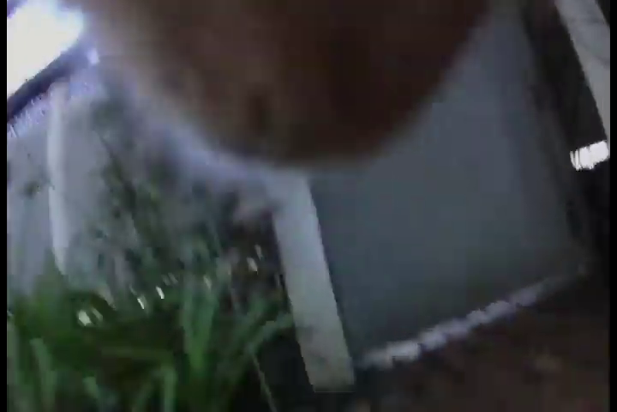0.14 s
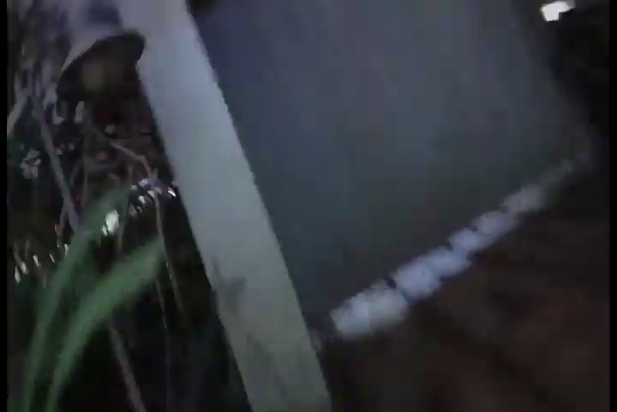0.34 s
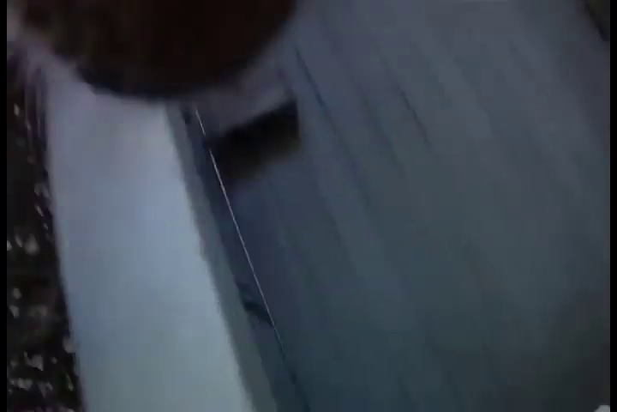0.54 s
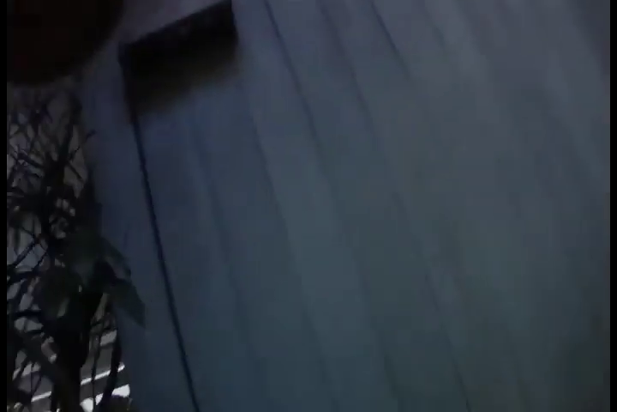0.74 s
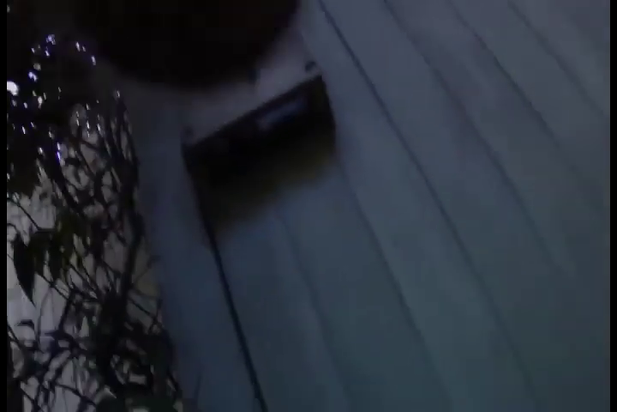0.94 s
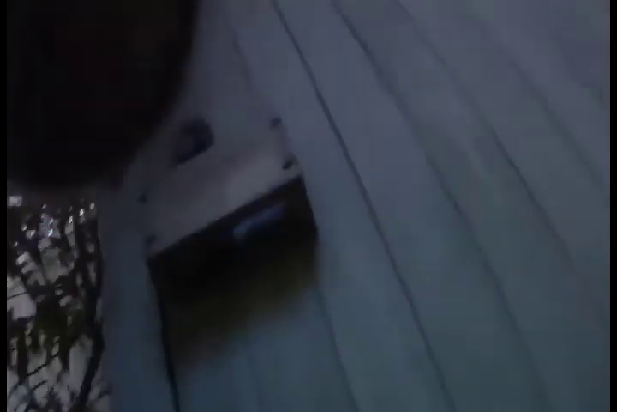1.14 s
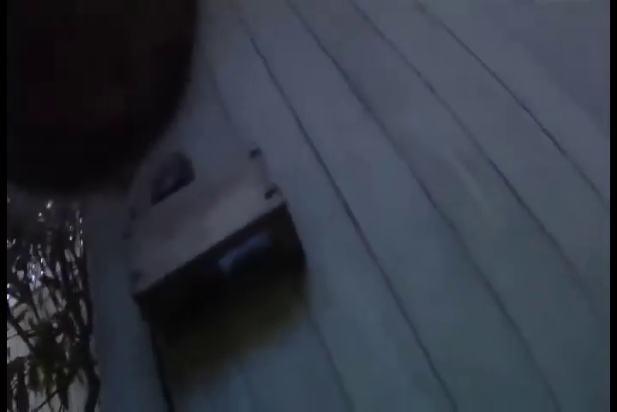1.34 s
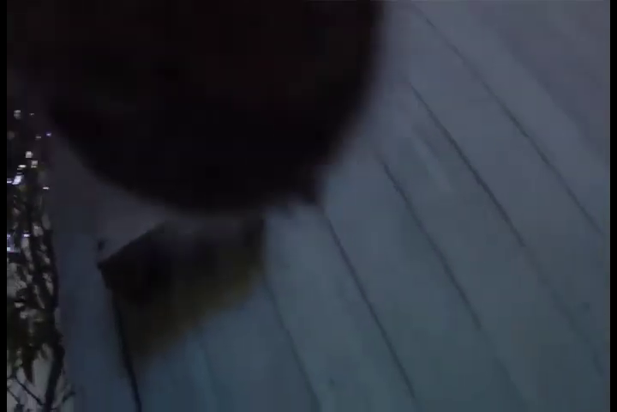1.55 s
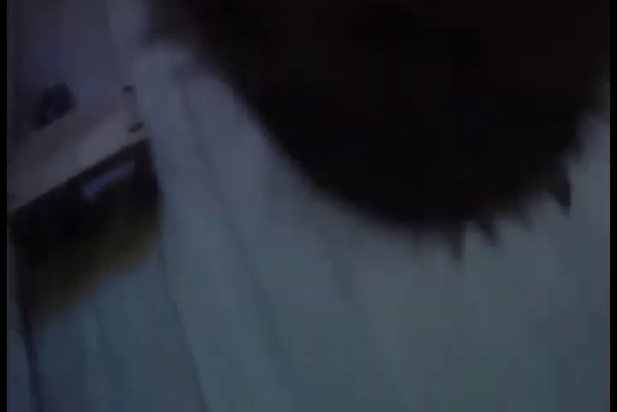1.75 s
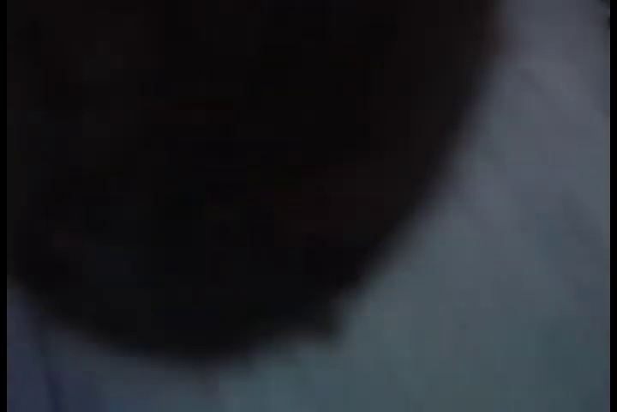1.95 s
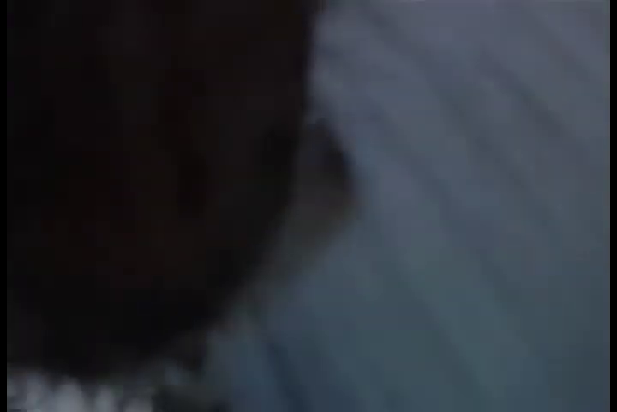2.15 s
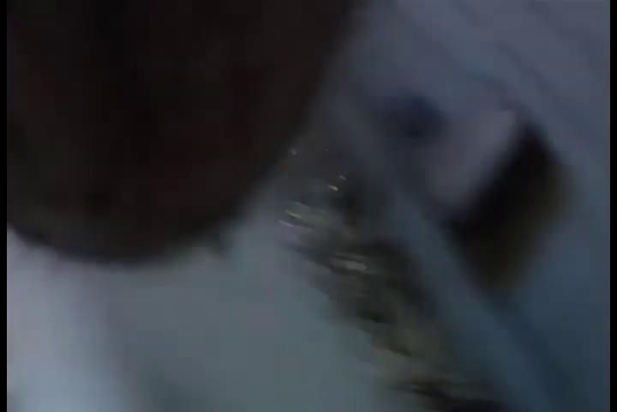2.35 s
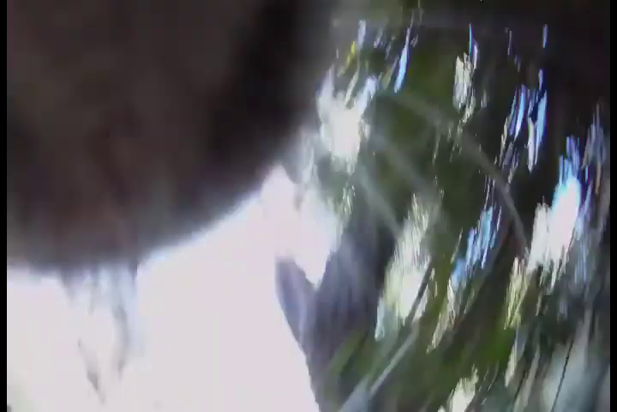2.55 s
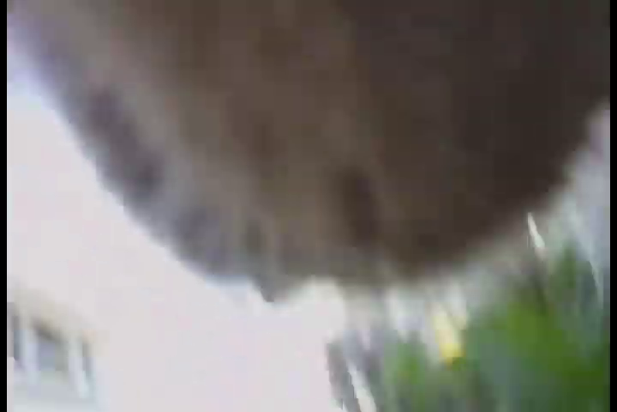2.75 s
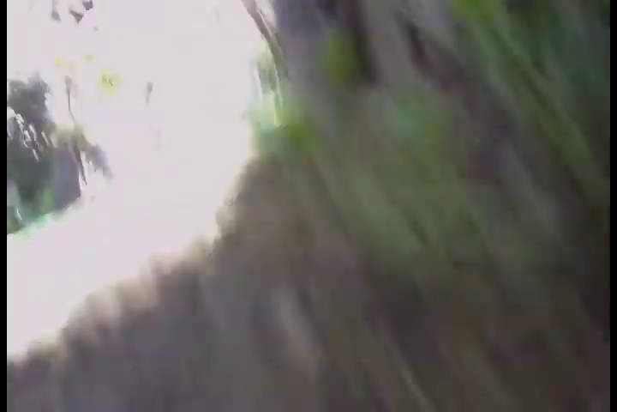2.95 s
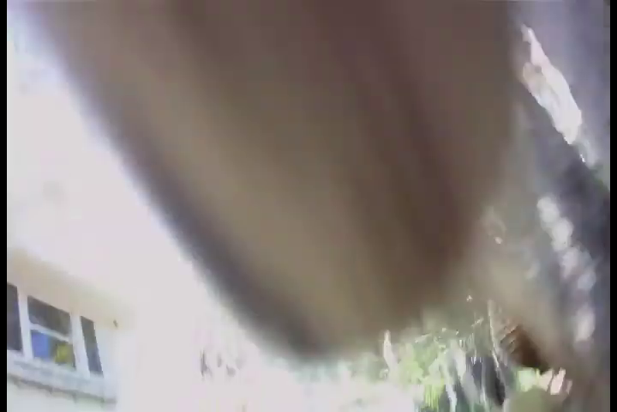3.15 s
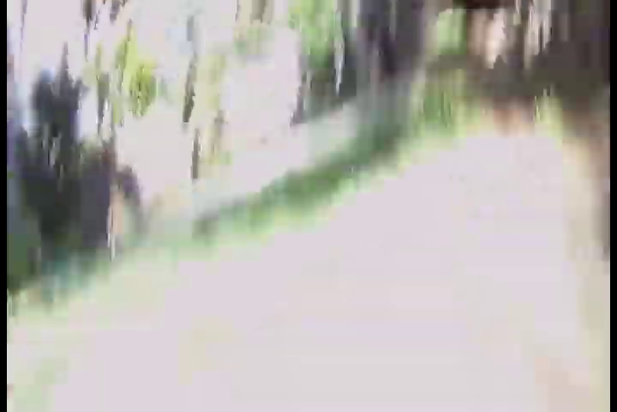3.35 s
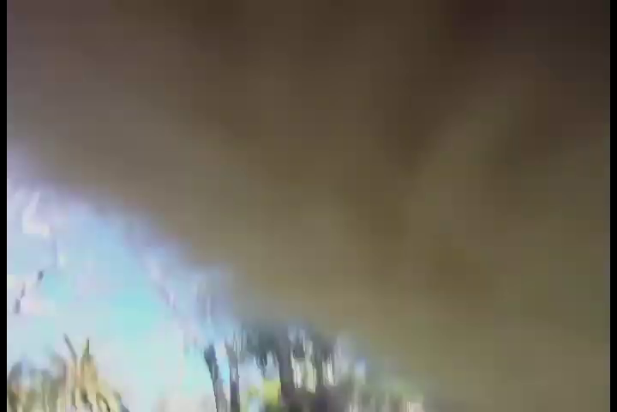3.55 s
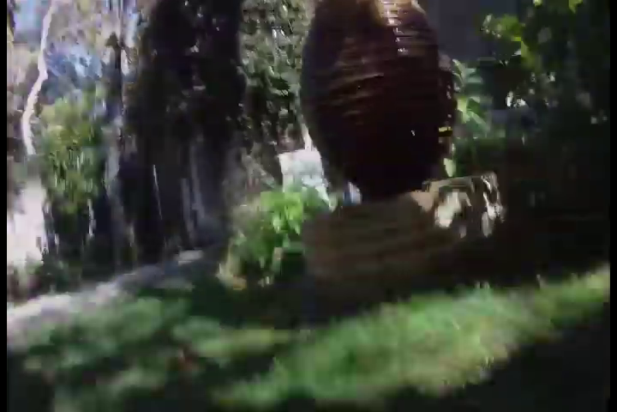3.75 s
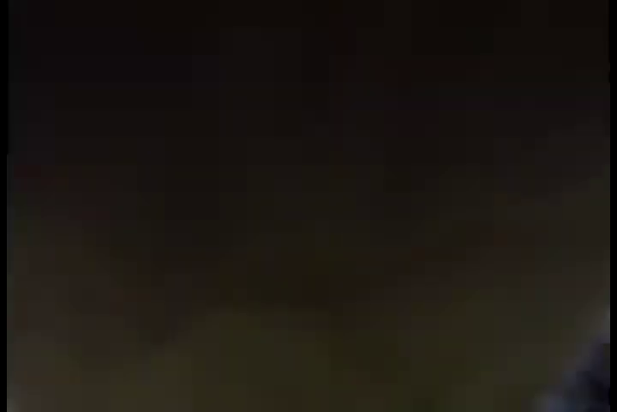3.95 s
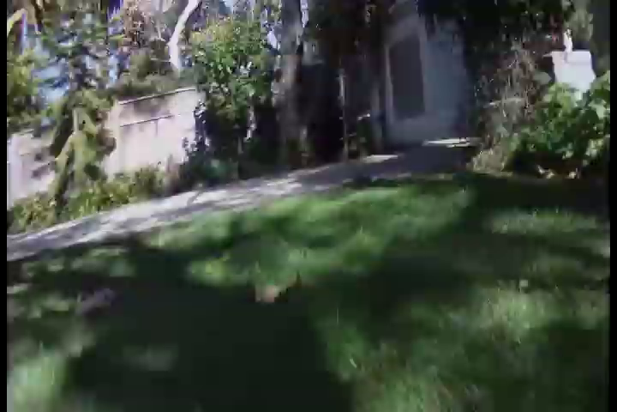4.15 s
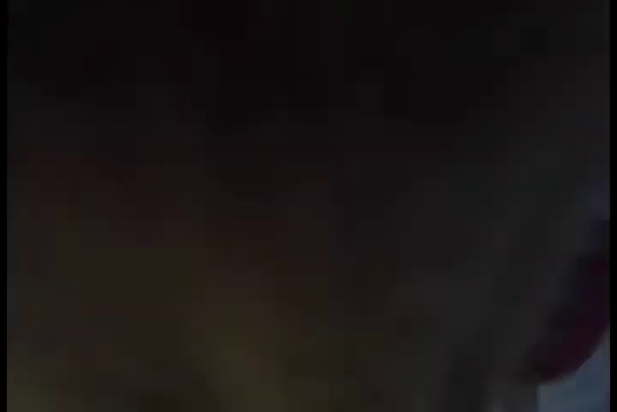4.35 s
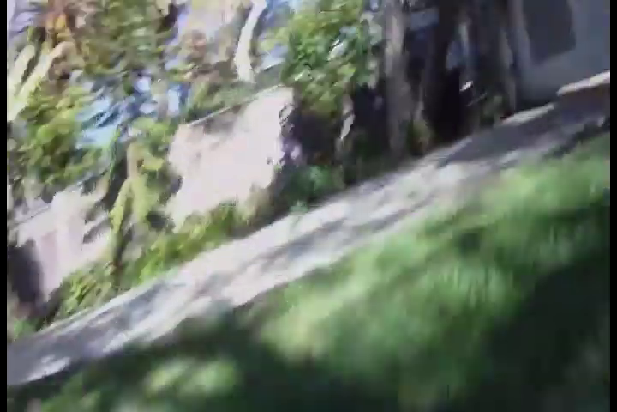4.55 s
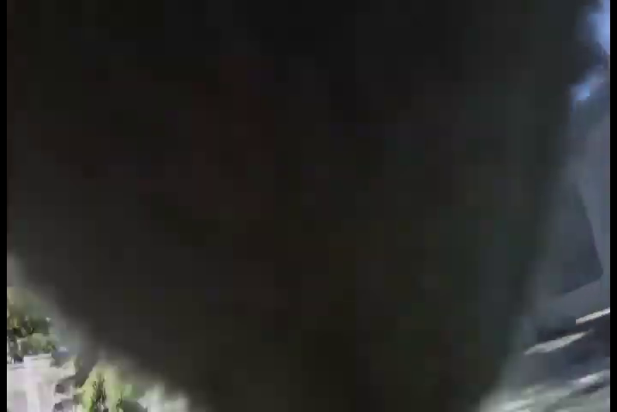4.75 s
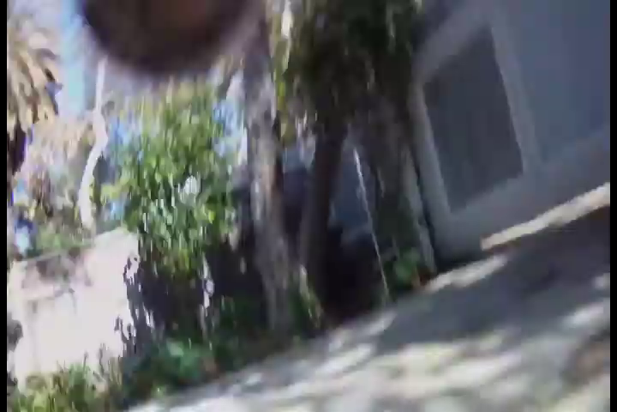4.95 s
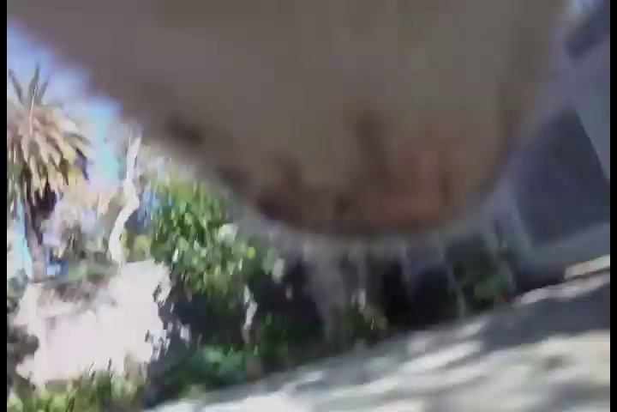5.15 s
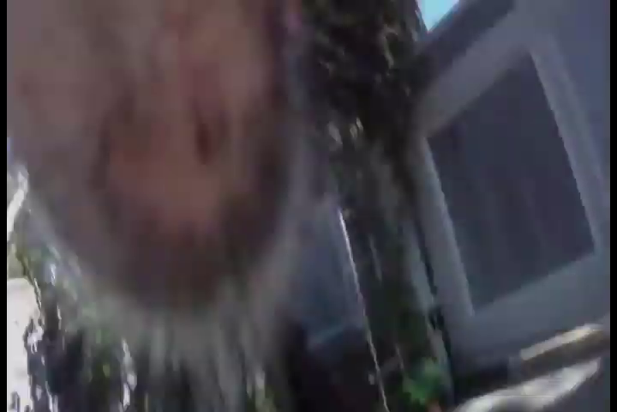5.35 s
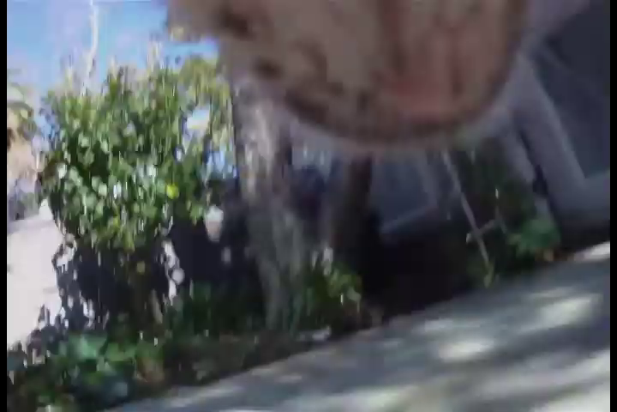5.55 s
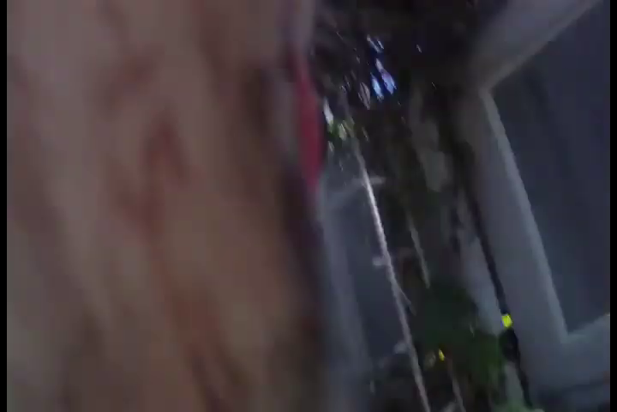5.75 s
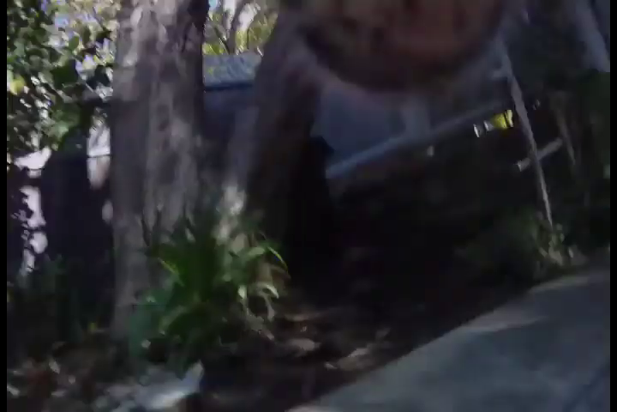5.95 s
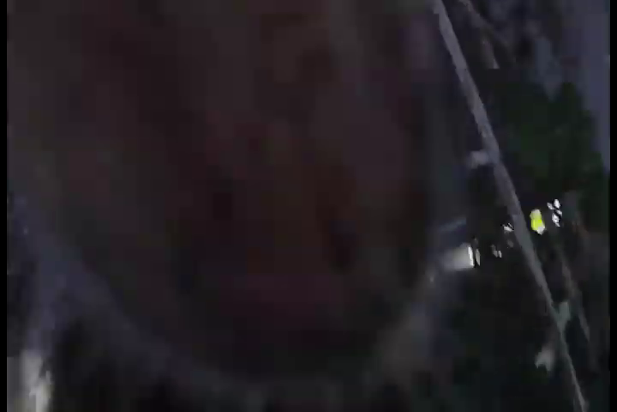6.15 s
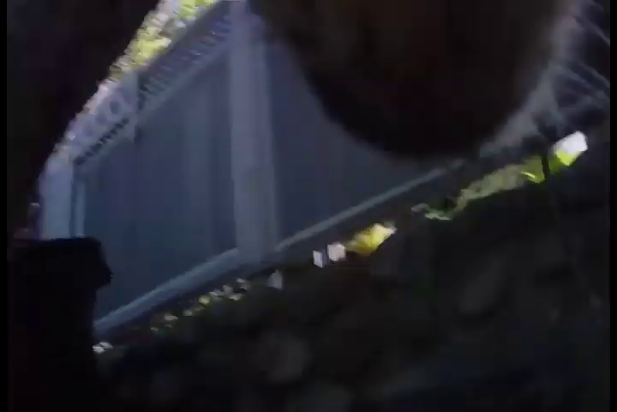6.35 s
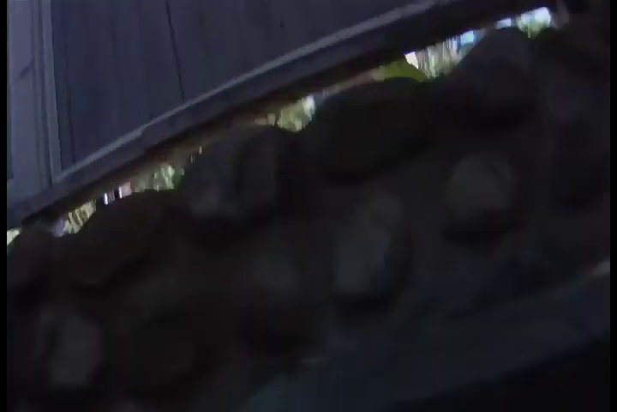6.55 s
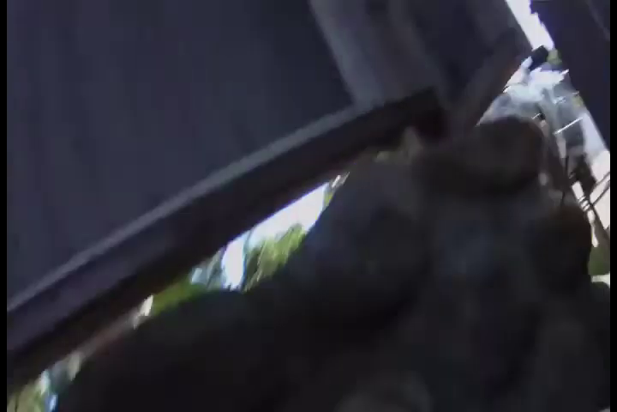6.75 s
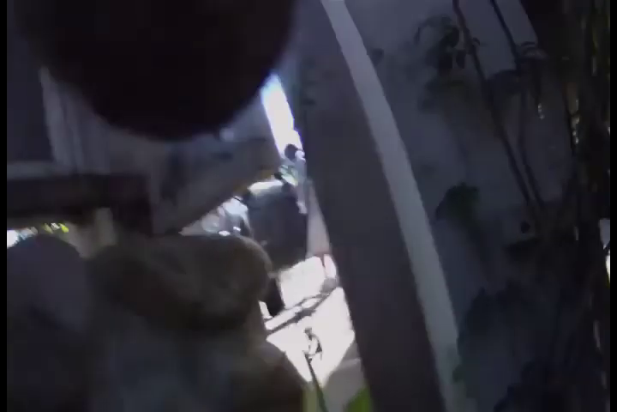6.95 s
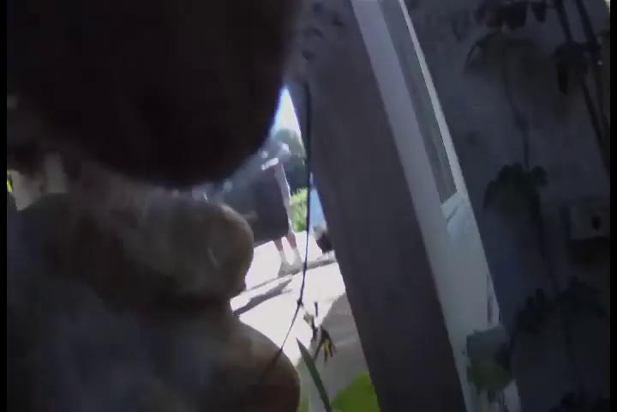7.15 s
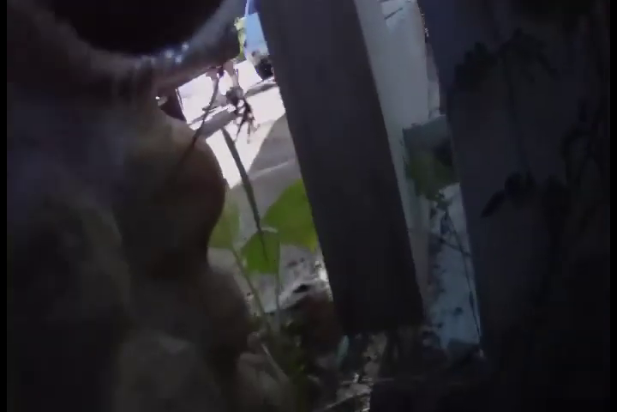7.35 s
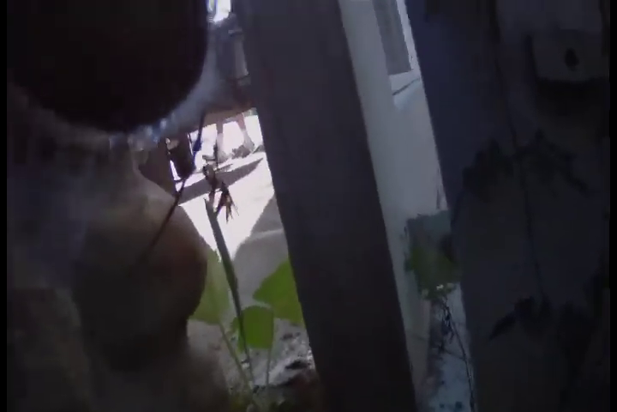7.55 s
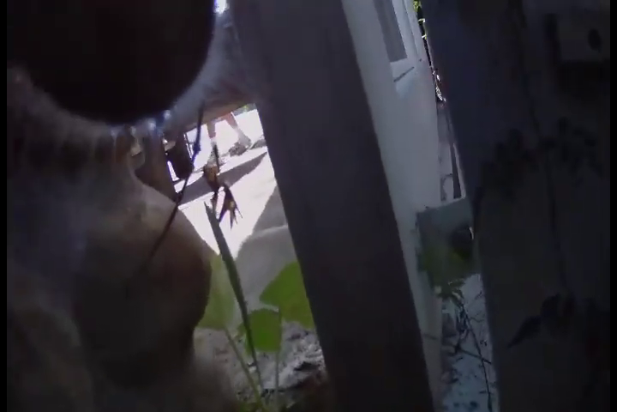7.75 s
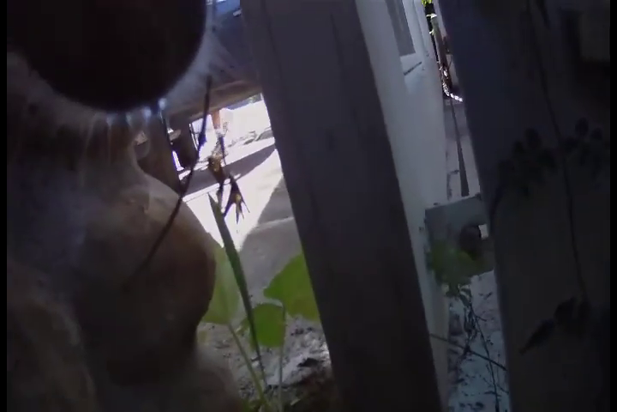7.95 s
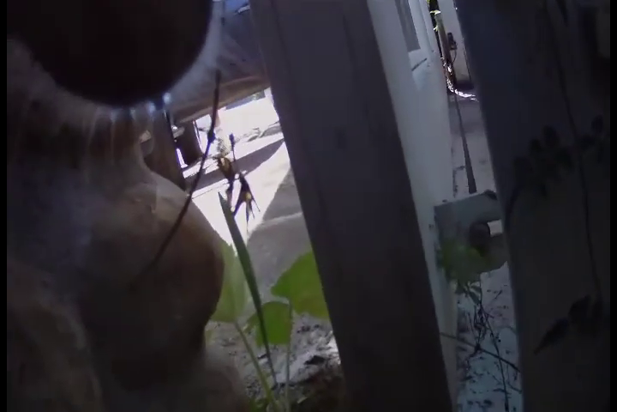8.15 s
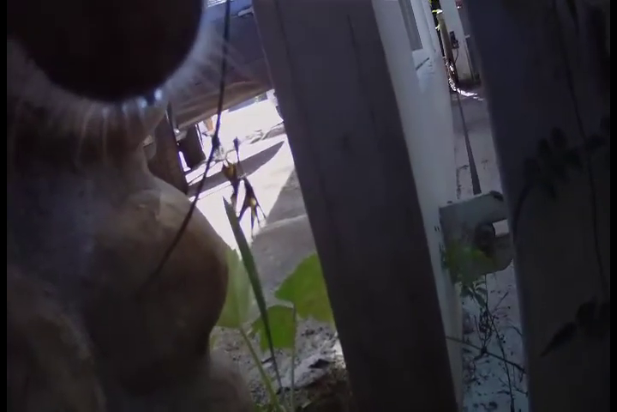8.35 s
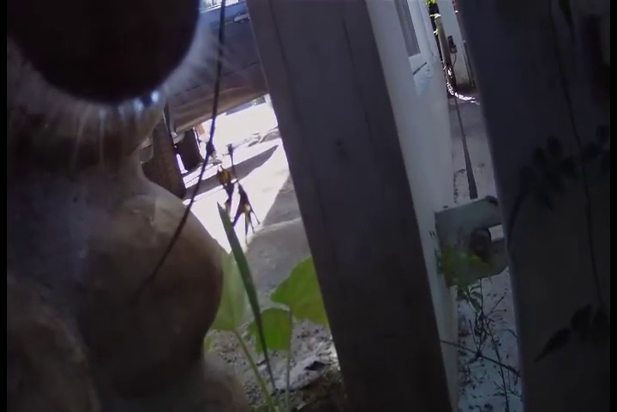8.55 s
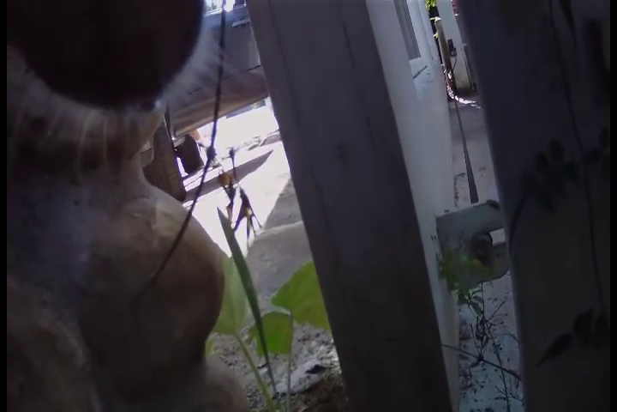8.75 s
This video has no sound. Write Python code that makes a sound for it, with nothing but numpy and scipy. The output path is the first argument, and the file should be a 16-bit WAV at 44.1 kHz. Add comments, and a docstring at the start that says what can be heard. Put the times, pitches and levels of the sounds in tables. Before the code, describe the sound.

A small camera on a running animal's collar clacks, rattles and scrapes against fur with tag jingles, pausing briefly for two faint bird chirps.

```python
"""In a garden, a small camera hangs from the collar of a running animal, heard from inside its plastic case.
Knocks ring the modes of the case; fur and strap rub on it as shaped noise with grains and ticks.
A metal tag and its ring jingle as sines until the fur damps them; in the pause a bird chirps two gliding sines.
Faint air and microphone hiss lie below as coloured noise, and the hardest knocks overload into hard clipping."""
import sys
import numpy as np
from scipy import signal
from scipy.fft import rfft, irfft
from scipy.io import wavfile

SR = 44100
rng = np.random.default_rng(int(sys.argv[2]) if len(sys.argv) > 2 else 0)


def put_to_file(sound):
    """Save the sound as 16-bit audio at rate SR, in the file named by the first command-line argument."""
    columns = np.atleast_2d(sound).T  # one column per channel
    safe = np.clip(columns, -1, 1)
    whole_steps = np.round(safe * 32767)
    wavfile.write(sys.argv[1], SR, whole_steps.astype(np.int16))


N = 388521   # length in samples

# knocks on the case, peak of each part: [t/s, hollow body level/dB, narrow walls level/dB, sharp edge level/dB]
KNOCKS = [(.1195, -19, -29, -59), (0.1772, -83, -33, -49), (.268, -58, -28, -59), (0.403, -30, -24.5, -52),
          (0.4276, -23.5, -40.5, -56.5), (0.448, -19, 2, -19), (.472, -44.5, -28.5, -48.5),
          (0.514, -63, -29.5, -33), (.6384, -43, -22, -26), (0.6469, -41, -27, -34), (.6633, -13, -4, -18),
          (0.6823, -24, -16.5, -42), (0.6946, -31.5, -19.5, -52), (0.7, -28, -23, -53),
          (0.7349, -15, -47, -58), (0.7482, -29, -52, -62), (0.8532, -54, -33, -57), (.9553, -31, -48, -72),
          (1.1525, -28.5, -69, -66), (1.1642, -74, -33.5, -60), (1.3132, -51, -30.5, -36),
          (1.346, -69, -33, -60), (1.3983, -57, -40, -64), (2.685, -45, -24, -63), (2.816, -39, -27, -48),
          (2.843, -30, -23, -58), (2.9491, -45, -31.5, -33), (3.022, -28.5, 0.5, -26),
          (3.0751, -38, -15.5, -24), (3.0821, -37, -14.5, -42), (3.0875, -36, -14, -42),
          (3.409, -29, -22, -52), (3.4276, -21.5, -41, -52), (3.4596, -18.5, -26, -55),
          (3.509, -33.5, -60, -63), (3.5899, -43.5, -33, -45), (3.7207, -63, -20, -13.5),
          (3.7674, -57, -30, -17), (3.7967, -28, -23, -42), (3.8648, -26.5, -57, -41),
          (3.9094, -28.5, -40, -69), (4.1153, -61, -19.5, -13), (4.2153, -25.5, -32, -46),
          (4.218, -39, -23, -45), (4.227, -22, -22.5, -32), (4.267, -22, -30, -37), (4.315, -20, -24, -48),
          (4.4246, -36, -49, -60), (4.485, -32.5, -52, -50), (4.513, -46, -15.5, -20.5),
          (4.586, -24.5, -31, -39), (4.6054, -21.5, -37.5, -67), (4.634, -23.5, 11.5, 1),
          (4.639, -22.5, 1.5, -15), (4.6468, -14, 2, -31), (4.659, -30, -19.5, -43.5),
          (4.7596, -29.5, -46, -57), (4.8176, -49, -34, -43), (4.8842, -39.5, -33, -52),
          (4.9466, -25.5, -24, -53.5), (4.976, -24, 12, 0.5), (4.983, -17.5, 7, -11.5),
          (5.0217, -34, 4, -6.5), (5.2454, -31, -19.5, -47), (5.295, -12, -22.5, -53.5),
          (5.328, -26, 14, 2), (5.3698, -20.5, -28.5, -50), (5.4, -30.5, -52, -65), (5.4293, -39, -5, -37),
          (5.4584, -48, -30.5, -41), (5.4837, -28, -53, -61), (5.6023, -30, -13, -36),
          (5.6554, -29, -23.5, -34), (5.703, -34.5, 14.5, 0), (5.7219, -24.5, 10.5, -6),
          (5.9602, -26.5, -15.5, -60), (6.0247, -32.5, -28, -40), (6.0686, -21.5, 10.5, -47),
          (6.0772, -25, 0, -15.5), (6.0841, -29.5, 1.5, -2.5), (6.1249, -43, -19.5, -60.5),
          (6.2697, -33.5, -51, -68), (6.3424, -45, -30, -50), (6.418, -32, -52, -61),
          (6.465, -27, -48, -62), (6.489, -45, -19.5, -42), (6.529, -25.5, -32, -64),
          (6.6392, -36, -44, -56), (6.6577, -76, -29, -28), (6.8322, -38, -28, -61), (6.903, -39, -24, -63),
          (6.964, -51, -36, -50), (6.987, -37.5, -32.5, -54), (7.0186, -22.5, 9.5, 5),
          (7.2304, -42, -19.5, -52.5), (7.2998, -30, -45, -64), (7.372, -47, -42, -66),
          (7.4112, -39.5, -36, -64), (7.5034, -36, 3.5, -5.5), (7.6036, -37, -37.5, -68)]
# modes of the case parts, levels relative within a part: [f/Hz, level/dB, t60/s]
BODY_MODES = [(384, -19, 0.017), (560, 1, 0.05), (732, -2.5, 0.012), (1070, -4.5, 0.014)]
BROAD_WALL_MODES = [(1374, -1, 0.012), (1640, 3.5, 0.018), (2246, -5, .015), (2380, -2.5, 0.056)]
NARROW_WALL_MODES = [(2750, -10, .012), (3020, 2, .013), (3270, -6, .018), (3680, 0, .014),
                     (4100, -4, .012), (4340, -5, .014), (4750, -9, .007), (5100, -7, .009),
                     (5870, -3, .011), (6300, -6, .009)]
EDGE_MODES = [(6940, 0.5, 0.012), (8900, -5.5, 0.0027), (9500, -4.5, 0.0018), (10900, -7, 0.0014),
              (13000, -9, .003)]
# how far the collar frees (+) or damps (-) the broad walls: [t/s, level/dB]
SLACK = [(0, 3), (1.4, 7), (2.7, -2.5), (3.1, -4.5), (3.5, -2), (4.6, -4), (5, 1), (6.1, -2.5), (7.6, 1)]
BROAD_SHARE = 0.53   # the broad walls lie between body and narrow walls: share of the body's level in dB


def knocks():
    """A blow rings hollow body, walls and edge of the case; the body is pushed the longest, the edge the briefest."""
    s, body_db, narrow_db, edge_db = np.transpose(KNOCKS)
    slack_db = np.interp(s, *np.transpose(SLACK))
    broad_db = BROAD_SHARE * body_db + (1 - BROAD_SHARE) * narrow_db + slack_db
    body = struck(BODY_MODES, body_db, contact_s=0.0039, detune=0.08,
                  crack_gain=24.0, first_gain=3.7, blur_gain=2.8)
    broad_walls = struck(BROAD_WALL_MODES, broad_db, contact_s=0.00041, detune=0.025,
                         crack_gain=31.0, first_gain=2.8, blur_gain=2.5)
    narrow_walls = struck(NARROW_WALL_MODES, narrow_db, contact_s=0.0007, detune=0.015,
                          crack_gain=4.0, first_gain=7.0, blur_gain=1.4)
    edge = struck(EDGE_MODES, edge_db, contact_s=0.00011, detune=0.086,
                  crack_gain=4.7, first_gain=1.0, blur_gain=0.3)
    return body + broad_walls + narrow_walls + edge


BLUR_SHARE = 0.9   # the blur dies sooner than the longest mode: share of its t60
CHATTER_SAMPLES = 300


def struck(modes, blow_db, contact_s, detune, crack_gain, first_gain, blur_gain):
    """Each blow is a short chatter of contact; the grip of the collar shifts and weights the modes anew."""
    hz, level_db, t60 = (column[:, None] for column in np.transpose(modes))
    t = np.arange(SR // 12) / SR
    out = np.zeros(N)
    grip = rng.standard_normal((len(KNOCKS), 2, len(modes), 1))
    chatter = rng.standard_normal((len(KNOCKS), CHATTER_SAMPLES)) * np.exp(-t[:CHATTER_SAMPLES] / contact_s)
    chatter[:, 0] = first_gain   # the first touch has a set strength
    # countless small modes blur into a noise that dies with the part
    blur_fade = from_db(-60 * t / (BLUR_SHARE * t60.max()))
    blur = blur_gain * rng.standard_normal((len(KNOCKS), len(t))) * blur_fade
    times = np.transpose(KNOCKS)[0]
    for s, db, (shift, weight), push, noise in zip(times, blow_db, grip, chatter, blur):
        strength = from_db(level_db + 3 * weight)
        sines = np.sin(2 * np.pi * hz * (1 + detune * shift) * t)
        tones = strength * from_db(-60 * t / t60) * sines
        crack = tones.sum(axis=0) + noise
        crack[0] += crack_gain   # the contact itself is heard as well, unpitched
        blow = signal.fftconvolve(crack, push)
        # a part radiates little outside the span of its own modes
        blow = band(blow, 0.82 * hz.min(), hz.max())
        blow = band(blow, 0.4 * hz.min(), 1.6 * hz.max())
        add(out, s, from_db(db) * blow / np.abs(blow).max())
    return out


# steady contact of fur and case as the animal moves: [t/s, level/dB]
MOTION = [(0, -60.5), (.6, -59.5), (1.1, -58), (1.45, -71), (1.75, -69), (1.95, -72), (2.24, -78.5),
          (2.5, -64.5), (2.75, -61), (3, -56), (3.85, -57), (3.96, -68), (4.1, -57), (4.7, -54.5),
          (5.5, -56.5), (6.7, -54.5), (6.9, -62), (7.1, -59), (7.35, -66), (7.6, -78.5), (7.75, -70.5),
          (8.1, -79), (8.81, -83.5)]
# the case slides over fur and strap, pressing harder until it slips off:
# [t/s of the slip, build-up/s, fur level/dB, treble level/dB, strap level/dB]
STROKES = [(.05, .1, -37.5, -50.5, -56), (.095, .03, -46.5, -61, -33.5), (.345, .09, -38.5, -43.5, -63),
           (.29, .03, -45, -55, -62), (0.384, 0.31, -46.5, -51, -56.5), (.44, .04, -47, -75, -40),
           (.68, .08, -44.5, -66.5, -40.5), (.755, .05, -46, -74, -26.5), (.8, 0.044, -53, -74, -36),
           (.86, .1, -44.5, -70, -44), (.915, 0.054, -46, -70, -42), (.967, .1, -47.5, -68, -36.5),
           (1.113, .09, -47.5, -73, -53), (1.158, .05, -55, -78, -34.5), (1.33, .1, -59.5, -88, -48.5),
           (1.406, .05, -62, -88, -47), (1.584, .15, -61.5, -88, -52), (2.69, .03, -44, -71, -67),
           (2.86, .04, -34, -70, -44.5), (2.92, .09, -51, -69, -37), (3.035, .15, -46, -61.5, -51.5),
           (3.089, .04, -44.5, -70, -48.5), (3.301, 0.05, -46.5, -54, -49.5), (3.441, .1, -36.5, -52, -40),
           (3.77, .3, -44, -56, -44.5), (3.88, .15, -46, -59.5, -43.5), (4.02, .08, -49.5, -62, -64),
           (4.103, .06, -43.5, -68, -48), (4.22, .15, -42, -51.5, -40), (4.517, .17, -42.5, -54, -51),
           (4.645, .12, -41, -60.5, -35), (4.763, .1, -54, -67, -48), (4.985, .1, -39.5, -54, -35),
           (5.334, .2, -41.5, -53.5, -43.5), (5.6, 0.15, -47.5, -63, -52.5), (5.715, .15, -39, -51, -45.5),
           (5.93, .3, -52.5, -67, -55), (6.065, .2, -44.5, -58, -45), (6.25, 0.28, -51, -70, -61),
           (6.4, .15, -48.5, -62, -49.5), (6.544, .05, -48.5, -69, -44.5), (6.65, .2, -44, -58, -55),
           (6.933, .1, -59, -77, -48), (7.03, .15, -46.5, -56, -62), (7.2, 0.86, -52.5, -65, -62),
           (7.3, .04, -58.5, -80.5, -55.5), (7.421, .08, -51.5, -74, -74), (7.625, 0.44, -58, -75, -67),
           (7.75, .1, -65.5, -90, -71)]
BUILD_UP_DB = 17.5   # rise over the build-up time


def pressure(steady_db, peaks_db, fade_db_per_s, build_share):
    """Gain of a rubbing layer: the steady contact, or a stroke where that is stronger."""
    t = np.arange(0, N, 16) / SR
    s, build_s = np.transpose(STROKES)[:2, :, None]
    before_db = (s - t) * BUILD_UP_DB / (build_s * build_share)
    after_db = (t - s) * fade_db_per_s
    stroke_db = peaks_db[:, None] - np.where(t < s, before_db, after_db)
    steady_level_db = np.interp(t, *np.transpose(MOTION)) + steady_db
    level_db = np.maximum(steady_level_db, stroke_db.max(axis=0))
    return np.interp(np.arange(N) / SR, t, from_db(level_db))


# colour of the fur noise: [f/Hz, level/dB per Hz]
FUR_SPECTRUM = [(500, -35.5), (900, -21), (1680, -1), (1900, -4), (2600, 1), (4200, 3.5), (5300, -6.5),
                (7000, -7), (10000, -38)]
# colour of the dragging strap: [f/Hz, level/dB per Hz]
STRAP_SPECTRUM = [(18, -56), (30, -12), (200, -9), (355, -5.5), (468, 2.5), (668, -3), (1010, -16),
                  (1200, -30), (1560, -57.5), (2640, -120)]
STEADY_TREBLE_DB, STEADY_STRAP_DB = -14.5, -2.5   # against the steady contact
FUR_FADE_DB_PER_S, STRAP_FADE_DB_PER_S = 301.5, 249.5   # after the slip
TICKS_PER_S, TICKS_DB = 300, -8   # hairs and grit that catch and snap free; level before the slack
NUDGES_PER_S, NUDGES_DB = 10, -18.5   # faint tinkles of the resting tag
HOLLOW_HZ, HOLLOW_T60_S, HOLLOW_DB = 513.4, 0.06, -7.5   # the air in the body hums along with the strap


def rubbing():
    """Hairs slip in dense fine grains that excite the walls; the strap drags in lumps on the hollow body."""
    fur_db, treble_db, strap_db = np.transpose(STROKES)[2:]
    burst_db = 3 * np.minimum(rng.exponential(1, (2, N)), 5)
    fur_grains, small_grains = from_db(burst_db) * rng.standard_normal((2, N))
    uneven = from_db(2.5 * drift(40))
    wall_modes = BROAD_WALL_MODES + NARROW_WALL_MODES
    walls = sum(from_db(level_db) * ring(fur_grains, hz, t60) for hz, level_db, t60 in wall_modes)
    fur = coloured(fur_grains, FUR_SPECTRUM) + from_db(-13) * rms_one(walls)
    # the patch of contact wanders, so each stretch of the spectrum swells on its own
    edges_hz = np.geomspace(600, 9600, 7)
    stretches = zip(edges_hz, edges_hz[1:])
    fur = rms_one(sum(from_db(1.8 * drift(14)) * band(fur, low, high) for low, high in stretches))

    ticks = small_grains * (rng.random(N) < TICKS_PER_S / SR)
    slack = from_db(np.interp(np.arange(N) / SR, *np.transpose(SLACK)))
    scuff = sum(from_db(level_db) * ring(ticks, hz, 0.007) for hz, level_db, _ in BROAD_WALL_MODES)
    scuff = scuff + 3 * band(ticks, 900, 6000)
    fur = fur + from_db(TICKS_DB) * slack * rms_one(scuff)

    nudges = small_grains * (rng.random(N) < NUDGES_PER_S / SR)
    fur = fur + from_db(NUDGES_DB) * rms_one(ring(nudges, TAG_TONES[0][0], 0.0055))

    treble_band = signal.butter(1, [5500, 9000], "band", fs=SR, output="sos")
    treble = rms_one(signal.sosfilt(treble_band, small_grains))

    lumps = rng.standard_normal(N) * from_db(3 * drift(35))
    strap = coloured(lumps, STRAP_SPECTRUM)
    strap = strap + from_db(HOLLOW_DB) * rms_one(ring(strap, HOLLOW_HZ, HOLLOW_T60_S))

    fur_gain = pressure(0, fur_db, FUR_FADE_DB_PER_S, build_share=0.95)
    treble_gain = pressure(STEADY_TREBLE_DB, treble_db, FUR_FADE_DB_PER_S, build_share=0.81)
    # the strap grips later
    strap_gain = pressure(STEADY_STRAP_DB, strap_db, STRAP_FADE_DB_PER_S, build_share=0.6)
    return uneven * (fur_gain * fur + treble_gain * treble) + strap_gain * strap


# strikes on the tag, with the free swing until the fur damps it:
# [t/s, main tone level/dB, second tone level/dB, low tone level/dB, free swing/s]
JINGLES = [(.176, -25, -55, -45, 0.011), (.515, -23, -45, -62, 0.0013), (.526, -32.5, -60, -68, 0.0049),
           (3.03, -43, -70, -68, .029), (3.59, -38.5, -70, -54, .013), (3.86, -51, -58, -62, 0.021),
           (4.214, -30, -54, -39, 0.052), (4.396, -35, -61, -68, 0.0013), (4.638, -34, -50, -47, .013),
           (4.748, -44, -80, -64, 0.009), (4.882, -31, -48, -42, 0.01), (4.978, -10, -38.5, -35.5, 0.02),
           (5.022, -23, -73, -66, 0.0048), (5.215, -38.5, -51.5, -54.5, .027),
           (5.245, -28, -58, -50.5, 0.048), (5.33, -29, -42, -39.5, 0.017), (5.512, -39, -51, -50, 0.028),
           (5.567, -32.5, -81, -48, 0.0056), (5.603, -32.5, -70, -52, 0.039),
           (5.703, -16.5, -54, -46.5, 0.014), (5.719, -24.5, -66, -59, .0083),
           (5.959, -63, -50.5, -61, 0.038), (6.069, -28, -67, -56, 0.0058),
           (6.343, -30.5, -45.5, -54, 0.019), (6.489, -47, -73, -62, 0.018), (7.018, -28, -51, -27, 0.077),
           (7.504, -43, -56, -63.5, .012), (7.506, -64.5, -58, -80, 0.05)]
# tones of the tag in the order main, second, third, low: [f/Hz, free t60/s]
TAG_TONES = [(6935, .12), (10080, .22), (12810, .08), (4310, .08)]
THIRD_TONE_DB = -8   # against the low tone, which it accompanies
# strikes on the collar ring: [t/s, level/dB, free swing/s]
RING_STRIKES = [(.176, -42, 0.0099), (.515, -47, .02), (3.025, -24.5, 0.021), (3.088, -53, 0.022),
                (3.7, -51, 0.025), (4.661, -52.5, 0.085), (4.983, -31.5, 0.02), (5.246, -47.5, 0.081),
                (5.329, -45, 0.042), (6.083, -40.5, 0.031), (6.42, -50, 0.055), (7.504, -41, 0.089)]
RING_HZ, RING_T60_S = 4610, 0.35


def jingles():
    """The tag with its four tones, slightly detuned by how it hangs, and the one tone of the collar ring."""
    out = np.zeros(N)
    hang = 1 + 0.001 * rng.standard_normal(len(JINGLES))
    for (s, main_db, second_db, low_db, free_s), tune in zip(JINGLES, hang):
        levels_db = [main_db, second_db, low_db + THIRD_TONE_DB, low_db]
        for (hz, t60), level_db in zip(TAG_TONES, levels_db):
            add(out, s, swing(hz * tune, level_db, t60, free_s))
    for s, level_db, free_s in RING_STRIKES:
        add(out, s, swing(RING_HZ, level_db, RING_T60_S, free_s))
    return out


def swing(hz, level_db, t60, free_s):
    """A metal tone that rings freely, then dies fast once the piece falls back on the fur."""
    t = np.arange(SR // 5) / SR
    damped_db = 2200 * np.maximum(t - free_s, 0)   # 2200 dB per s
    return from_db(level_db - 60 * t / t60 - damped_db) * np.sin(2 * np.pi * hz * t)


# two chirps, each a list of points, levels before the lift: [t/s, f/Hz, level/dB]
BIRD_NOTES = [
    [(1.69, 6778, -77), (1.718, 7400, -70), (1.74, 7350, -76), (1.764, 7300, -72), (1.81, 7185, -78)],
    [(1.84, 7450, -81), (1.848, 7340, -71), (1.892, 7230, -69), (1.9, 7150, -80)],
]
BIRD_LIFT_DB = 4.5


def bird():
    """Two thin whistles: gliding sines, slightly rough from a fast random wobble in level."""
    out, t = np.zeros(N), np.arange(N) / SR
    for note in BIRD_NOTES:
        s, hz, level_db = np.transpose(note)
        note_db = np.interp(t, s, level_db, left=-200, right=-200)
        gain = from_db(note_db + BIRD_LIFT_DB + 2.5 * drift(60))
        phase = 2 * np.pi * np.cumsum(np.interp(t, s, hz)) / SR
        out += gain * np.sin(phase)
    return out


# colour of garden air and microphone hiss: [f/Hz, level/dB per Hz]
AIR_SPECTRUM = [(15, -46), (25, -7), (134, -10), (166, -5.5), (285, -19.5), (326, -4.5), (775, -16),
                (5730, -25.5), (13200, -27), (16000, -21.5)]
AIR_DB = -67.5   # middle of the wavering level


def air():
    """Garden air and microphone hiss: coloured noise that wavers a little in level."""
    return from_db(AIR_DB + 1.5 * drift(5.4)) * coloured(rng.standard_normal(N), AIR_SPECTRUM)


def from_db(db):
    """Decibels to gain."""
    return 10 ** (np.asarray(db) / 20)


def rms_one(x):
    """Scale to unit rms."""
    return x / np.sqrt(np.mean(x ** 2) + 1e-20)


def drift(rate_hz):
    """Random wander of rms 1: noise through two equal low-pass poles, warmed up for a second."""
    r = np.exp(-2 * np.pi * rate_hz / SR)
    wander = signal.lfilter([1], [1, -2 * r, r * r], rng.standard_normal(N + SR))
    return rms_one(wander[SR:])


def coloured(x, spectrum):
    """Give a signal a spectrum, joined on a log-frequency axis; rms 1."""
    hz, level_db = np.transpose(spectrum)
    grid_hz = np.fft.rfftfreq(N, 1 / SR) + 1   # +1 avoids log of zero
    gain = from_db(np.interp(np.log(grid_hz), np.log(hz), level_db))
    return rms_one(irfft(rfft(x) * gain, N))


def ring(clicks, hz, t60):
    """A two-pole resonator: a unit click sets a sine of about height 1 ringing."""
    r, w = from_db(-60 / (t60 * SR)), 2 * np.pi * hz / SR
    return signal.lfilter([0, np.sin(w)], [1, -2 * r * np.cos(w), r * r], clicks + 1e-18)


def band(x, low_hz, high_hz):
    """Band-pass."""
    return signal.sosfilt(signal.butter(2, [low_hz, high_hz], "band", fs=SR, output="sos"), x)


def add(out, s, sound):
    """Mix a short sound in at a time."""
    at = round(s * SR)
    out[at:at + len(sound)] += sound[:N - at]


def scene():
    """All sources at the microphone."""
    return (knocks() + rubbing() + jingles() + bird() + air())[None]


RUMBLE_CUT_HZ, TOP_CUT_HZ = 37, 16000


def record(dry):
    """Overload clips hard at full scale; deep bass is cut, peaks clip again at 0.9, then the top is cut."""
    bass_cut = signal.butter(2, RUMBLE_CUT_HZ, "high", fs=SR, output="sos")
    top_cut = signal.cheby2(14, 60, TOP_CUT_HZ, fs=SR, output="sos")   # 60 dB down from the cut upwards
    overloaded = np.clip(dry, -1, 1)
    thinned = signal.sosfilt(bass_cut, overloaded)
    return signal.sosfilt(top_cut, np.clip(thinned, -0.9, 0.9))


dry = scene()
out = record(dry)
put_to_file(out)
```